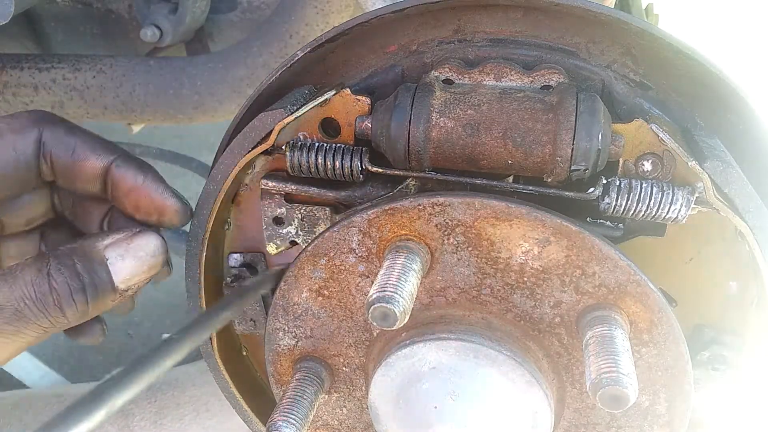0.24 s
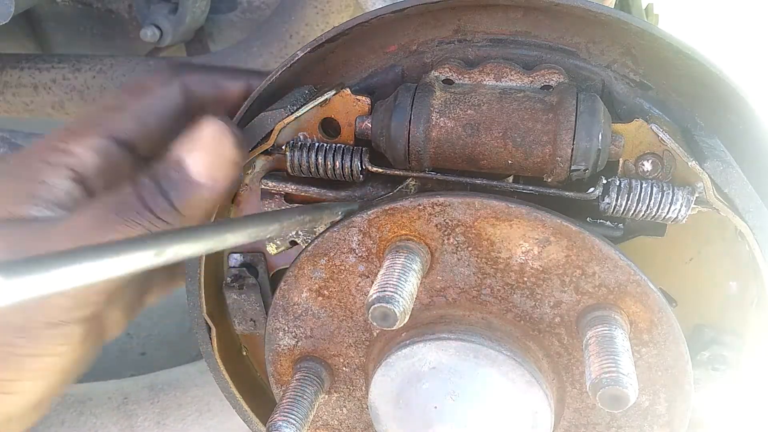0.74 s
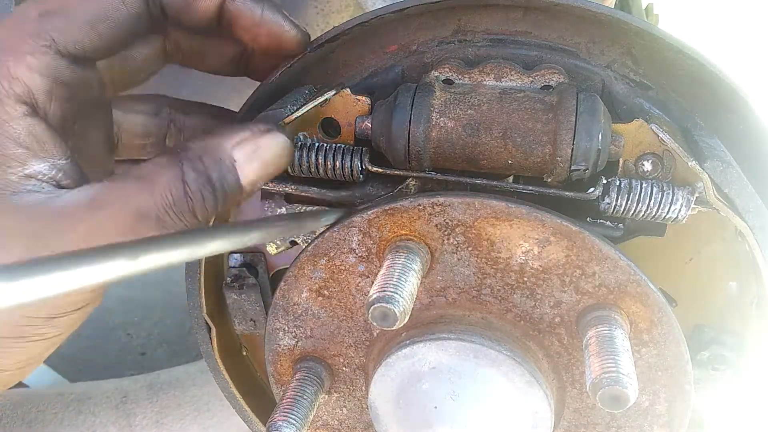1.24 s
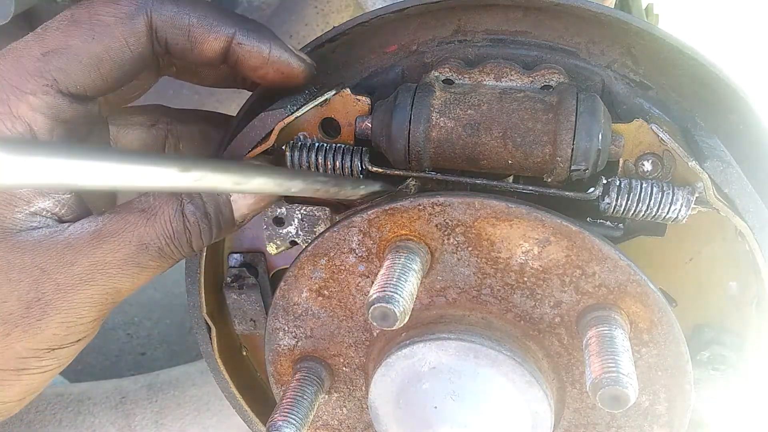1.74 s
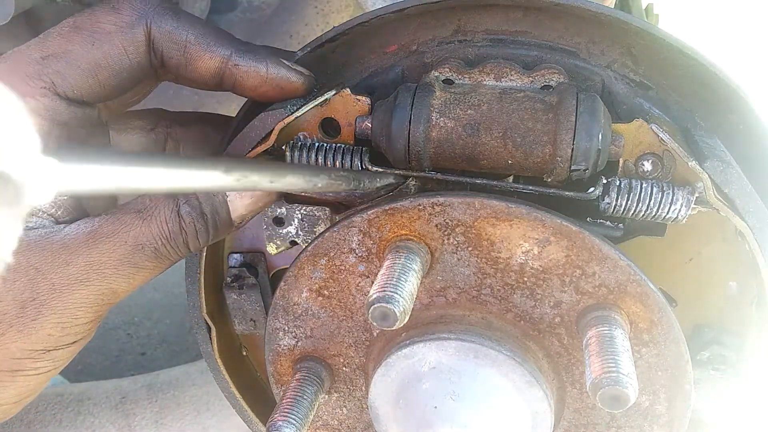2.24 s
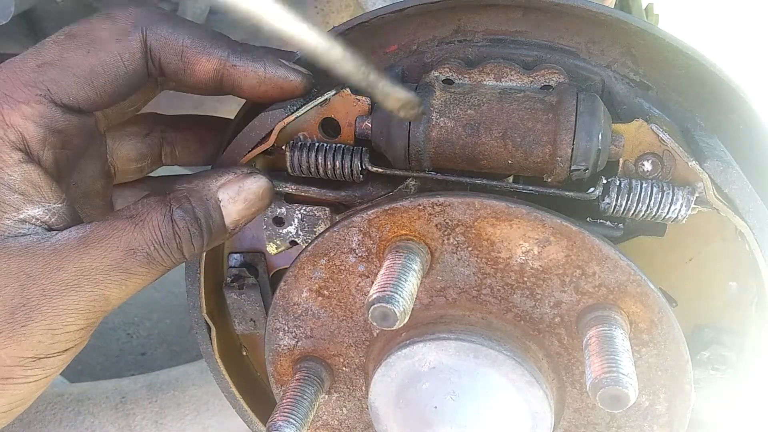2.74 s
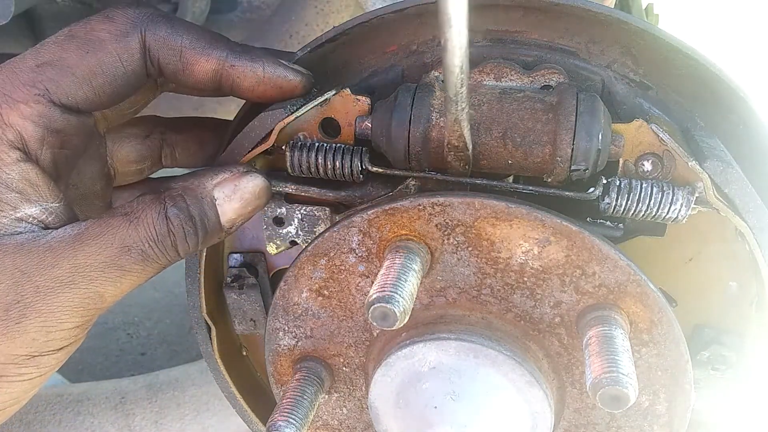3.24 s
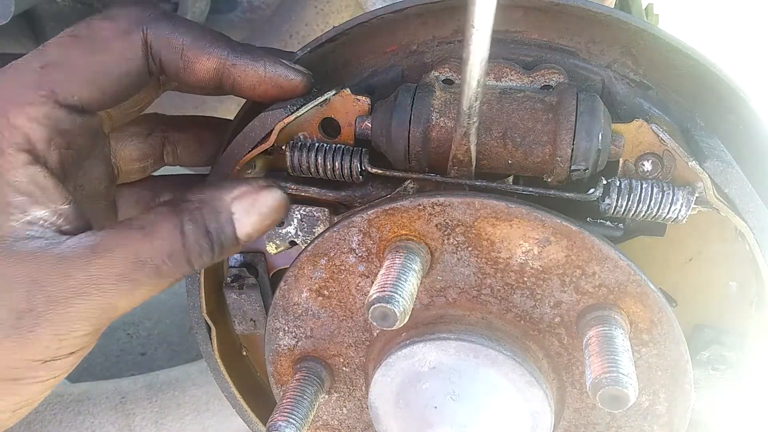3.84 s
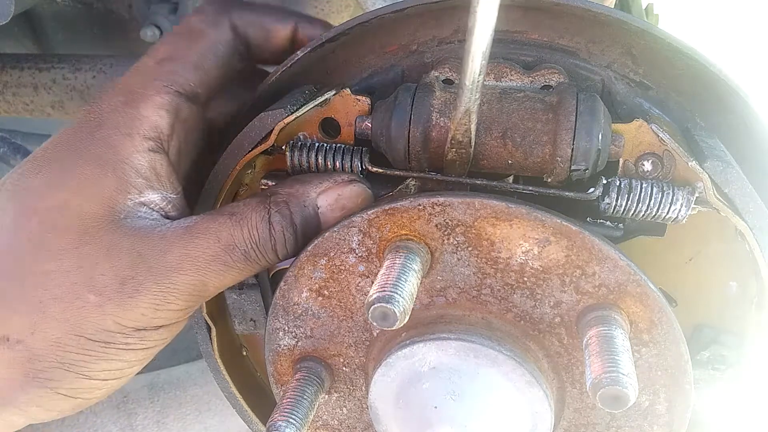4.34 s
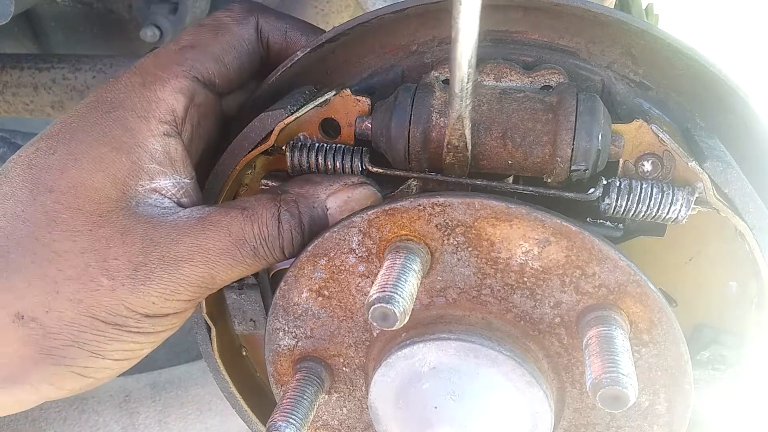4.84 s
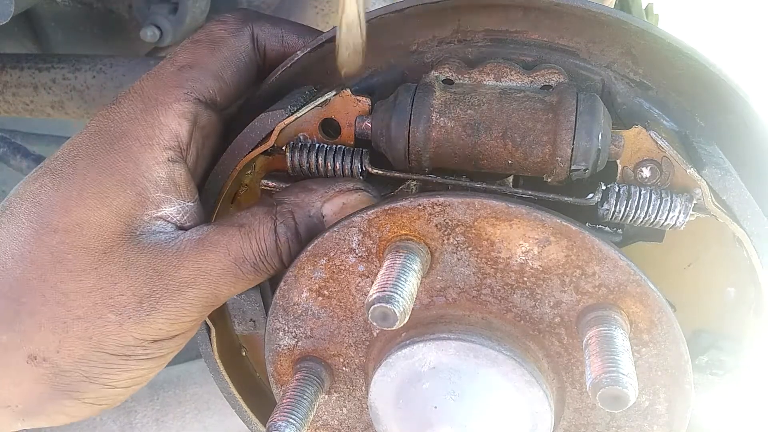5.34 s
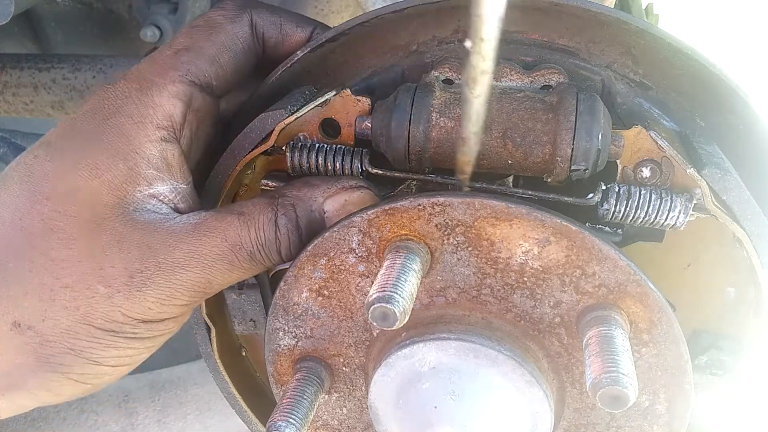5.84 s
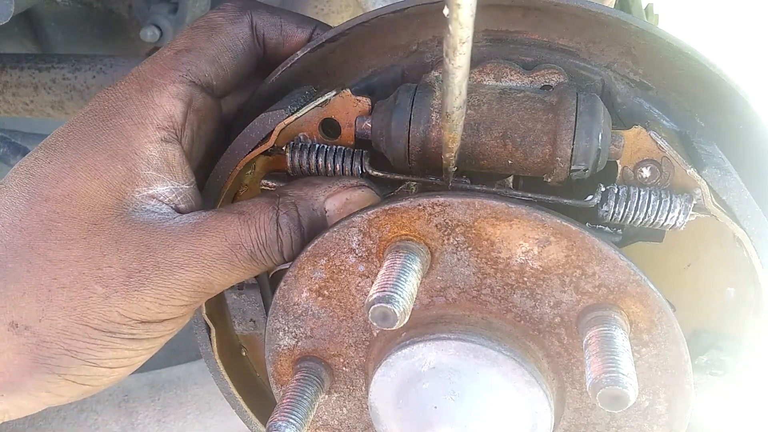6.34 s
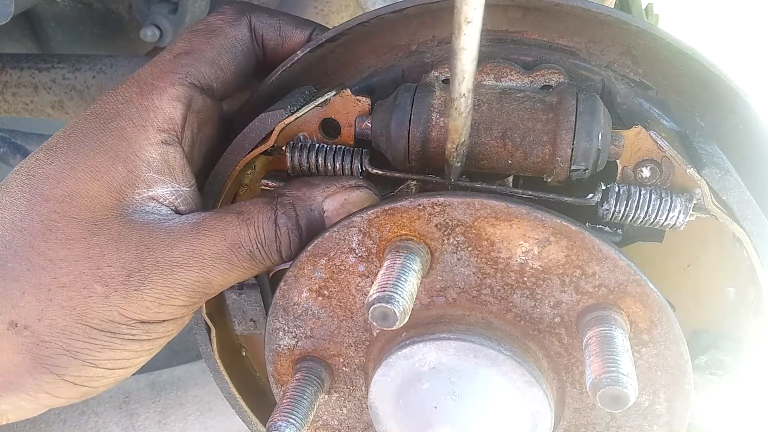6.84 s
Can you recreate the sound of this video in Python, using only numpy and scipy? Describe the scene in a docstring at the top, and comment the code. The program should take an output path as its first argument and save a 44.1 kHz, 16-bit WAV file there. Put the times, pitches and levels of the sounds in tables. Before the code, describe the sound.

A quiet garage gives faint hum and soft hiss, with uneven low rumble of hands close to the microphone. From 0.3 to 0.75 s small steel ticks and clinks mix with short faint scrapes. Sparse clicks and taps follow at 1.3, 1.55 and 1.85 s, a muted twang near 2.1 and a longer click at 2.25. A scrape and slight twang at 2.5 lead to the loud, bright, ringing clink at 2.65. Dull bumps surround a crisp snap at 3.2; a low scrape comes at 3.6. A sharp, bright double snap lands at 4.0. At 4.95 the heaviest clunk, lower and scraping, sets the spring shuddering in four quick weakening pulses. Hard clacks at 5.3 and a light rapid clatter from 5.6 to 5.75 follow, then a softer knock at 6.0, a dull bump at 6.25, rumble, a tiny tick at 6.85 and a faint final scrape.

```python
"""A steel screwdriver levers a shoe and its return spring into place on a car's drum brake, close to the microphone.
Knocks are noise cracks that ring steel modes; scrapes are dense random clicks through the same steel.
A loose part clinks and the spring twangs and shudders, as decaying sines; the shoe scrapes and snaps home.
Hands bump and rumble near the hand-held camera's microphone, over a quiet garage of distant hum and hiss."""
import sys
import numpy as np
from scipy import signal
from scipy.fft import rfft, irfft
from scipy.io import wavfile

SR = 44100
rng = np.random.default_rng(int(sys.argv[2]) if len(sys.argv) > 2 else 0)


def store_wav(level_fs):
    """Save 16-bit WAV to argv[1]."""
    pcm = np.round(np.clip(np.atleast_2d(level_fs), -1, 1) * 32767)
    wavfile.write(sys.argv[1], SR, pcm.T.astype(np.int16))


N = 312669
CLOCK = np.arange(N) / SR  # s from the start
AGE = np.arange(SR * 6 // 10) / SR  # s within one event, 0.6 s long

# rumble of the hands by the microphone, before its own gain and flutter: [t/s, level/dB]
HAND_LEVELS = [(0.0, -64.5), (0.18, -43.5), (0.29, -60), (0.61, -53), (0.95, -56), (1.72, -52),
               (2.59, -57.5), (2.74, -57.5), (3.2, -54), (3.63, -50), (4.62, -56.5), (4.99, -49.5),
               (5.41, -54), (5.79, -49), (6.08, -48.5), (6.28, -44), (6.52, -44), (7.09, -48)]
# colour of skin and grip noise: [f/Hz, level/dB]
HAND_COLOUR = [(20, -18.5), (45, -10), (75, -3), (140, -0.5), (240, -3.5), (310, -14), (390, -9.5),
               (480, -20), (750, -22), (1400, -42.5), (3000, -63.5)]
# faint distant hum, each line wandering about its level: [f/Hz, level/dB]
HUM_LINES = [(97, -72.5), (366, -66.5), (554, -64)]
# colour of the garage's noise: [f/Hz, level/dB]
GARAGE_COLOUR = [(25, -28.5), (60, -6), (100, -4.5), (200, -11.5), (400, -12), (700, -15.5), (1200, -22),
                 (2500, -29.5), (3800, -35.5), (4700, -47.5), (6500, -44), (16000, -44)]
# dull bumps of hand and shoe; none peaks before 0.3 s: [peak t/s, level/dB, f/Hz, half length/s]
BUMP_EVENTS = [(.16, -47, 141, 0.023), (0.529, -40, 79, .015), (0.719, -41.5, 193, 0.026),
               (1.158, -29.5, 206, 0.0028), (1.598, -39.5, 338, 0.016), (1.868, -43.5, 333, 0.025),
               (2.806, -32, 218, 0.0031), (2.879, -31.5, 97, 0.017), (3.187, -32, 126.6, .009),
               (3.459, -33.5, 130, .019), (3.738, -43, 156, 0.011), (4.033, -33, 410, .012),
               (4.875, -26, 119, .003), (4.996, -30, 100, 0.0091), (6.26, -37, 107.3, .018)]
# a loose part rings freely: [t/s, level/dB, boost of modes above 4 kHz/dB, decay time multiple]
CLINK_EVENTS = [(.330, -45.5, 27.5, 1.7), (.605, -28.5, 7, 1.45), (.729, -33.5, -7, 1.35),
                (1.298, -34.5, -3, 2.7), (1.566, -58, 12, 1.2), (1.85, -41, 19, 1.15),
                (2.654, -13, -0.5, 1.0), (5.358, -28, 4, .7)]
# modes of the loose part, before that boost and multiple: [f/Hz, level/dB, t60/s]
LOOSE_MODES = [(2580, -21, 0.11), (3720, -20, 0.043), (3594, 3, 0.0874), (4940, -17, 0.066),
               (5580, -31.5, 0.068), (8330, -24, 0.043), (8800, -35, 0.073), (12400, -51.5, 0.22),
               (14380, -41, 0.17)]
# steel on steel, level before the knocks' gain:
# [t/s, level/dB, crack t60/s, brightness/dB, f/Hz of the mode struck hardest]
KNOCK_EVENTS = [(0.3302, -25, 0.04, -2, 2284), (.605, -30, 0.1, 2, 2360), (.689, -32, .09, -12.5, 2870),
                (.729, -36.5, 0.19, -11, 2510), (.975, -45.5, 0.098, -18, 2220),
                (1.261, -44.5, 0.035, -1, 2920), (1.2984, -33, 0.11, -2.5, 2540),
                (1.531, -34.5, 0.22, -8.5, 2090), (1.567, -25, 0.058, -1.5, 3540),
                (1.73, -36, 0.093, -5.5, 2120), (1.825, -30, .14, -1, 2067),
                (1.85, -20.5, 0.048, 1.5, 3510), (2.067, -36.5, 0.093, -17, 2200),
                (2.245, -25.5, 0.13, -2.5, 2730), (2.655, -25.5, 0.071, 3.5, 2890),
                (2.935, -49.5, 0.025, -8, 2680), (3.173, -21.5, 0.046, 3, 6051),
                (3.194, -33, 0.12, -23, 2630), (3.262, -40.5, 0.1, -9, 2130),
                (3.537, -37, 0.14, -11.5, 1490), (4.015, -17, 0.037, 9.5, 2580),
                (4.023, -19.5, 0.033, -20.5, 2890), (4.921, -32, .074, -17, 1180),
                (4.9486, -23.5, .04, -8.5, 1203), (4.971, -10, 0.052, -1.5, 1150),
                (5.323, -18.5, 0.04, -7.5, 1310), (5.3399, -16.5, 0.028, -6, 1330),
                (5.358, -26.5, .026, 1, 6800), (5.584, -20, 0.034, 0.5, 2400),
                (5.637, -33, 0.058, -6.5, 2320), (5.641, -27, 0.045, 0, 2370),
                (5.664, -41.5, 0.11, -3, 3750), (5.7305, -27, 0.034, 10, 3680),
                (5.745, -33.5, 0.12, 0, 3400), (6.0212, -28.5, 0.031, -11, 2686),
                (6.854, -42, .05, -5, 2490)]
# colour of a steel contact: [f/Hz, level/dB]
CONTACT_COLOUR = [(100, -17), (400, -8), (700, -1), (1200, 2.5), (2400, 1.5), (3100, -1.5), (3650, 0.5),
                  (4100, -3.5), (4600, -9.5), (5800, -7.5), (6700, -11.5), (8500, -13.5), (11000, -24.5),
                  (15000, -23)]
# modes of the shoe and backing plate: [f/Hz, level/dB, t60/s]
BRAKE_MODES = [(410.5, -13, 0.24), (700, -12.5, 0.13), (882, -16, 0.28), (975, -5, 0.09),
               (1170, -13, 0.033), (1201, -11.5, .08), (1300, -2.5, 0.08), (1498, -11, .1),
               (1690, -8.5, 0.087), (2087, -2.5, 0.1), (2114, -11, 0.078), (2364, 0, 0.032),
               (2400, 3, 0.046), (2552, 0, 0.036), (2770, -18.5, 0.11), (2725, -8, 0.11),
               (2800, -1.5, 0.036), (3537, -2, 0.035), (3604, 4.5, 0.046), (3880, -17, 0.058),
               (4160, -13.5, 0.025), (4330, -12.5, 0.08), (5117, -22, 0.04), (5000, -23.5, 0.059),
               (6050, -5.5, 0.027), (5876, -10.5, 0.031), (6363, -2.5, 0.036), (6840, -1.5, 0.033),
               (6920, -12, .05), (7750, -8.5, .05), (7800, -15, .05)]
# modes of the screwdriver's shank: [f/Hz, level/dB, t60/s]
SHANK_MODES = [(940, -10, .08), (2107, -8, 0.087), (2686, -3.5, 0.084), (2902, -2, 0.074),
               (6051, -11, 0.074)]
# the whole brake rocking on its axle: [f/Hz, level/dB, t60/s]
AXLE_MODES = [(173.8, -3.5, 0.29), (340, -6.5, 0.18)]
# tip or shoe dragging over rust: [hardest push t/s, rise/s, level/dB, brightness/dB, f/Hz rubbed hardest]
SCRAPE_EVENTS = [(.449, 0.046, -48.5, -17, 2340), (.68, 0.033, -43, -23, 2480),
                 (.903, 0.035, -48.5, -9.5, 2120), (1.135, 0.033, -61, 3, 2450),
                 (1.361, 0.037, -47.5, -16.5, 3630), (1.925, 0.03, -42, -11, 2110),
                 (2.504, 0.021, -38, -14, 2680), (3.582, 0.038, -39, -19, 1480),
                 (3.985, 0.051, -48.5, -10, 2100), (4.046, 0.027, -36, -4, 2680),
                 (4.123, 0.028, -50.5, -5, 6700), (4.957, .022, -24, -4.5, 1160),
                 (5.28, 0.017, -40.5, -13, 1120), (5.336, 0.034, -31.5, -6.5, 2170),
                 (5.932, 0.044, -51, -12.5, 2240), (6.078, 0.027, -47, -9, 2730),
                 (7.035, .05, -46, -10, 2360)]
# the spring is plucked, level before the twangs' gain: [t/s, level/dB]
TWANG_EVENTS = [(2.068, -53.5), (2.512, -43.5)]
# modes of the spring's wire: [f/Hz, level/dB, t60/s]
WIRE_MODES = [(990, -15.5, 0.86), (1770, 2, .27), (2470, -22, .12), (3316, -27, 0.13)]
# modes of the spring's sway: [f/Hz, level/dB, t60/s]
SWAY_MODES = [(338, -4.5, 0.0618), (382, 4, 0.057), (575, -7.5, 0.0432)]

# low spots sound heavier; a glancing contact is over before it moves the plate or sets it ringing
WEIGHT_DB, WEIGHT_DB_PER_OCTAVE, TYPICAL_HZ = 3, -5, 2500
GLANCE_S, GLANCE_DB, GLANCE_RING_DB = 0.035, -10, -5
FALL_PER_RISE = 0.9  # a scrape's push dies away a little faster than it swells
# the stretched spring shudders against the shoe, weaker at every swing
SHUDDER_START_S, SHUDDER_PERIOD_S, SHUDDER_DB, SHUDDER_LOSS_DB = 4.9735, .039, -14.5, 1.5


def undb(db):
    """Decibels to gain."""
    return 10 ** (np.asarray(db) / 20)


def unit(x):
    """Scale to rms 1."""
    return x / np.sqrt(np.mean(x ** 2))


def attack_unit(x, count=350):
    """Scale so that the first 8 ms (count samples) have rms 1."""
    return x / np.sqrt(np.mean(x[:count] ** 2))


def fade(t60):
    """Exponential decay after a blow, down 60 dB after t60 seconds."""
    return np.exp(-np.log(1000) * AGE / max(t60, 1 / SR))


def add(out, s, sound):
    """Mix a sound in at s seconds, or at the start if s is negative."""
    start = max(int(s * SR), 0)
    out[start:start + len(sound)] += sound[:N - start]


def walk(rate):
    """Smooth random wandering with a spread near 1, taking `rate` new values a second."""
    steps = rng.standard_normal(int(N / SR * rate) + 2)
    return np.interp(CLOCK * rate, np.arange(len(steps)), steps)


def colour(x, points, size=2048):
    """Causal minimum-phase filter with the gain of (f/Hz, level/dB) points."""
    hz, db = np.transpose(points)
    bins = np.arange(size // 2 + 1) * SR / size
    gain = undb(np.interp(np.log(bins + 1), np.log(hz), db))
    # fold the cepstrum so that no sound precedes its cause
    cepstrum = irfft(np.log(gain))
    cepstrum[1:size // 2] *= 2
    cepstrum[size // 2 + 1:] = 0
    impulse = irfft(np.exp(rfft(cepstrum)))
    return signal.fftconvolve(x, impulse)[:len(x)]


def ring(modes, focus_hz=1, focus_db=0):
    """Decaying modes, slightly varied each time; the point of contact favours those near focus_hz."""
    hz, db, t60 = np.transpose(modes)
    size, detune, sign = rng.standard_normal((len(hz), 3)).T
    nearness = np.exp(-(25 * np.log(hz / focus_hz)) ** 2)
    db = db + focus_db * nearness + 1.5 * size
    hz = hz * (1 + .001 * detune)
    out = np.zeros(len(AGE))
    for f, g, t in zip(hz, np.sign(sign) * undb(db), t60):
        age = AGE[:int(2 * t * SR)]
        out[:len(age)] += g * np.exp(-np.log(1000) * age / t) * np.sin(2 * np.pi * f * age)
    return out


def hands(gain_db=3, flutter_db=4):
    """Shifting grip close to the microphone makes an uneven rumble of coloured noise."""
    db = np.interp(CLOCK, *np.transpose(HAND_LEVELS)) + flutter_db * walk(rate=24)
    return undb(db + gain_db) * unit(colour(rng.standard_normal(N), HAND_COLOUR))


def garage(hiss_db=-54):
    """Distant hum of slowly wandering sines, over steady coloured noise."""
    hum = sum(undb(db + 2 * walk(rate=2.6)) * np.sin(2 * np.pi * hz * CLOCK) for hz, db in HUM_LINES)
    return hum + undb(hiss_db) * unit(colour(rng.standard_normal(N), GARAGE_COLOUR))


def bumps(grit=0.36):
    """Soft contacts give a few low cycles, made uneven by rubbing noise."""
    out = np.zeros(N)
    middle = AGE.mean()
    lag = AGE - middle
    for s, db, hz, length in BUMP_EVENTS:
        rub = unit(colour(rng.standard_normal(len(AGE)), HAND_COLOUR))
        swell = np.exp(-(lag / length) ** 2)
        add(out, s - middle, undb(db) * swell * (np.sin(2 * np.pi * hz * lag) + grit * rub))
    return out


def clinks(push_s=.01):
    """The loose part rings longer or shorter as it is held, and brighter when caught on its edge."""
    out = np.zeros(N)
    for s, db, upper_db, hold in CLINK_EVENTS:
        modes = [(hz, mode_db + upper_db * (hz > 4000), t60 * hold) for hz, mode_db, t60 in LOOSE_MODES]
        add(out, s, undb(db) * ring(modes) * (1 - fade(push_s)))
    return out


def weight(t60, hz):
    """How strongly a knock drives the lows, in dB: more at low spots, less when glancing."""
    spot_db = WEIGHT_DB_PER_OCTAVE * np.log2(hz / TYPICAL_HZ)
    return WEIGHT_DB + spot_db + GLANCE_DB * (GLANCE_S / t60) ** 2


def clatter(t60, count=110):
    """The many small parts behind the shoe: crowded modes, a different mix at every blow."""
    place, life, size = rng.random(count), rng.random(count), rng.standard_normal(count)
    hz = 300 + 15500 * place ** 1.5
    # some last longer than others; the high ones die first
    mode_t60 = t60 * (.5 + .7 * life) * (2500 / np.maximum(hz, 2500)) ** .25
    rate = np.log(1000) / mode_t60
    age = AGE[:len(AGE) // 5]
    sound = size @ (np.exp(-np.outer(rate, age)) * np.sin(2 * np.pi * np.outer(hz, age)))
    return attack_unit(np.pad(sound, (0, len(AGE) - len(age))))


def knocks(gain_db=-3, tick_db=12, build=.05, parts_db=-3, parts_hold=1.6, ring_db=3, focus_db=9):
    """Each knock is a sharp tick, a crack, a clatter of small parts, and the longer ring of shoe, plate and tool."""
    out = np.zeros(N)
    for s, db, t60, top_db, hz in KNOCK_EVENTS:
        glance = (GLANCE_S / t60) ** 2
        # a contact that chatters longer also takes longer to build up
        onset = 1 - fade(build * t60)
        noise = rng.standard_normal(len(AGE)) * fade(t60)
        parts = undb(parts_db) * clatter(parts_hold * t60) / 2
        crack = (noise + parts) * onset
        crack[0] += undb(tick_db) * glance
        steel = attack_unit(ring(BRAKE_MODES + SHANK_MODES, hz, focus_db) * onset)
        blow = attack_unit(colour(crack, CONTACT_COLOUR)) + undb(ring_db + GLANCE_RING_DB * glance) * steel
        # a heavy blow moves the whole plate; a hard, short contact reaches the top modes
        tilt = [(1000, weight(t60, hz)), (1900, 0.0037), (3700, 0), (6000, top_db), (13000, 2.0 * top_db - 3.5)]
        add(out, s, undb(db + gain_db) * attack_unit(colour(blow, tilt)))
    return out


def spring(events, modes, push_s, gain_db=0):
    """A springy part rings at each event, building up while the push lasts."""
    out = np.zeros(N)
    for s, db in events:
        add(out, s, undb(db + gain_db) * ring(modes) * (1 - fade(push_s)) ** 2)
    return out


def thumps():
    """Every knock rocks the whole brake on its axle, harder for heavier blows."""
    events = [(s, db + weight(t60, hz) / 2) for s, db, t60, _, hz in KNOCK_EVENTS]
    return spring(events, AXLE_MODES, push_s=.02, gain_db=-13.5)


def scrapes(slips_per_s=2000, smear_t60=0.026, ring_db=-2, focus_db=7, weight_db=8, light_hz=2500):
    """Dense stick-slip clicks, bunched where the rust catches, excite the shoe and plate."""
    out = np.zeros(N)
    middle = AGE.mean()
    lag = AGE - middle
    for s, rise, db, edge_db, hz in SCRAPE_EVENTS:
        slips = (rng.random(len(AGE)) < slips_per_s / SR) * rng.standard_normal(len(AGE))
        catches = undb(2.5 * walk(rate=220)[:len(AGE)])
        push = np.exp(-np.abs(lag / np.where(lag < 0, rise, FALL_PER_RISE * rise)) ** 1.7)
        rub = unit(slips * catches) * push
        smear = rng.standard_normal(len(AGE)) * fade(smear_t60)
        body = attack_unit(colour(smear, CONTACT_COLOUR))
        body = body + undb(ring_db) * attack_unit(ring(BRAKE_MODES, hz, focus_db))
        # rubbing a heavy, low-pitched spot drags the whole shoe, so its low modes join in
        low_db = max(weight_db * np.log2(light_hz / hz), -2)
        body = colour(body, [(1200, low_db), (1900, 0.0052), (7000, edge_db)])
        add(out, s - middle, undb(db) * signal.fftconvolve(rub, body / np.linalg.norm(body)))
    return out


def twangs():
    """The plucked spring rings in its wire's modes."""
    return spring(TWANG_EVENTS, WIRE_MODES, push_s=0.0063, gain_db=3.5)


def shudders(count=4):
    """The spring's sway modes ring at evenly spaced, weakening swings against the shoe."""
    swings = [(SHUDDER_START_S + k * SHUDDER_PERIOD_S, SHUDDER_DB - k * SHUDDER_LOSS_DB) for k in range(count)]
    return spring(swings, SWAY_MODES, push_s=0.028)


def scene():
    """All of the brake's sounds over hands and garage, on one channel."""
    background = hands() + garage()
    contacts = bumps() + clinks() + knocks() + thumps() + scrapes()
    return (background + contacts + twangs() + shudders())[None]


def record(dry):
    """The camera's microphone cuts the deep bass below 48 Hz and the top above 16.1 kHz."""
    dry = signal.sosfilt(signal.butter(3, 48, "high", fs=SR, output="sos"), dry)
    return signal.sosfilt(signal.ellip(8, .2, 70, 16100, fs=SR, output="sos"), dry)


dry = scene()
out = record(dry)
store_wav(out)
```